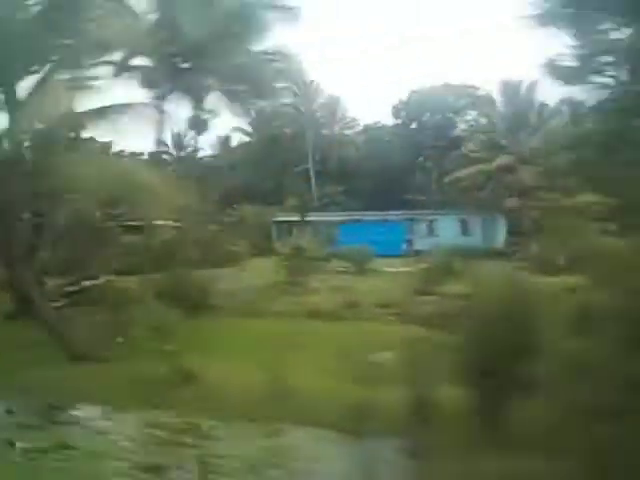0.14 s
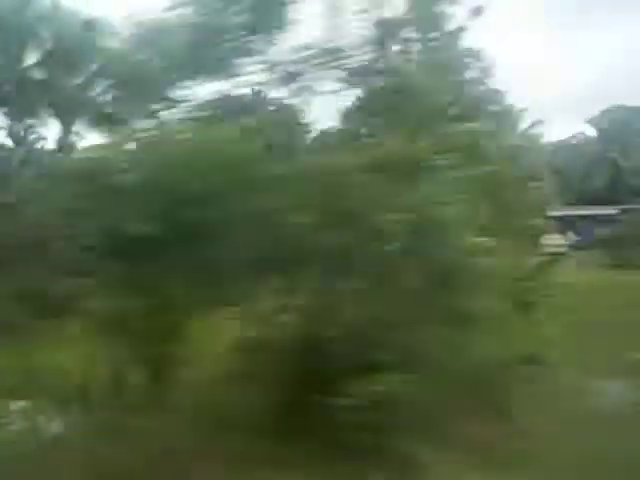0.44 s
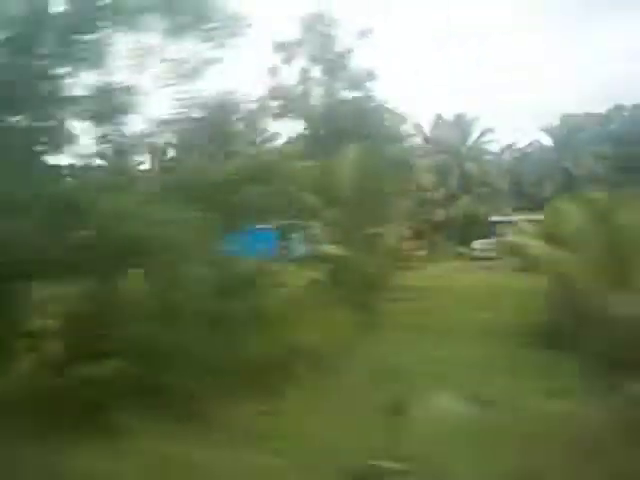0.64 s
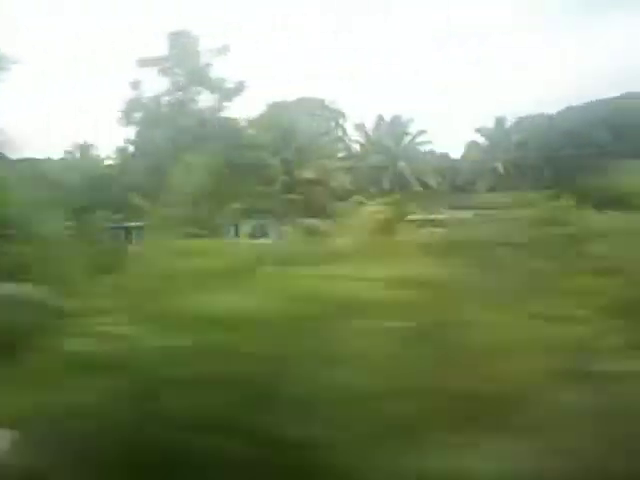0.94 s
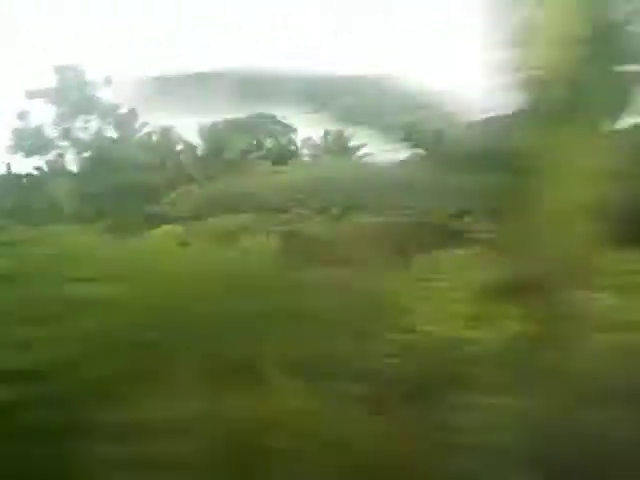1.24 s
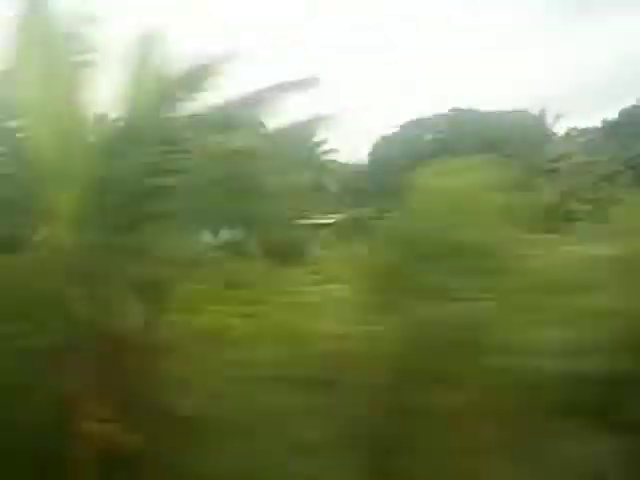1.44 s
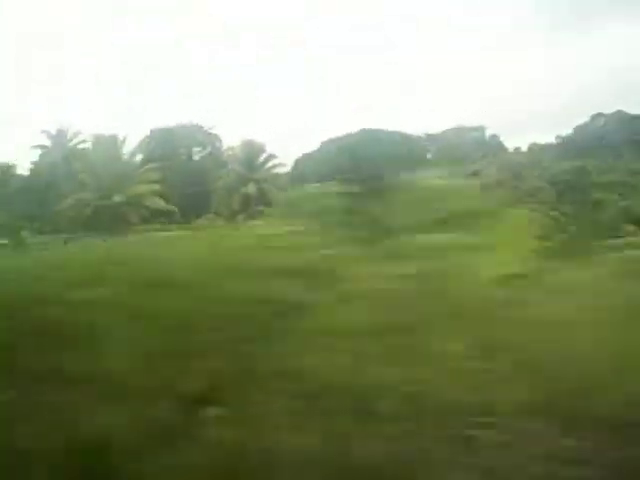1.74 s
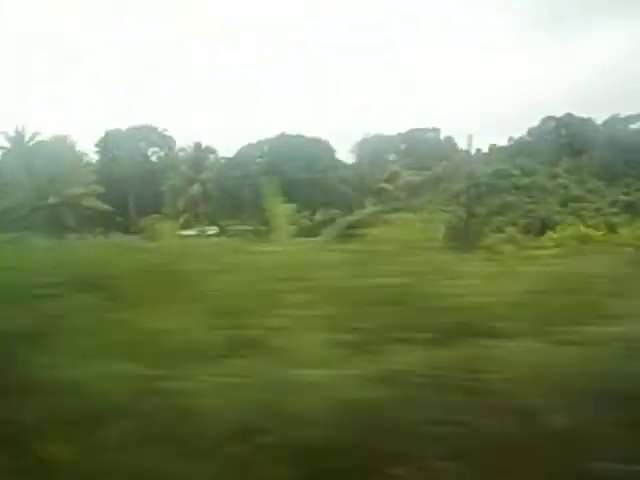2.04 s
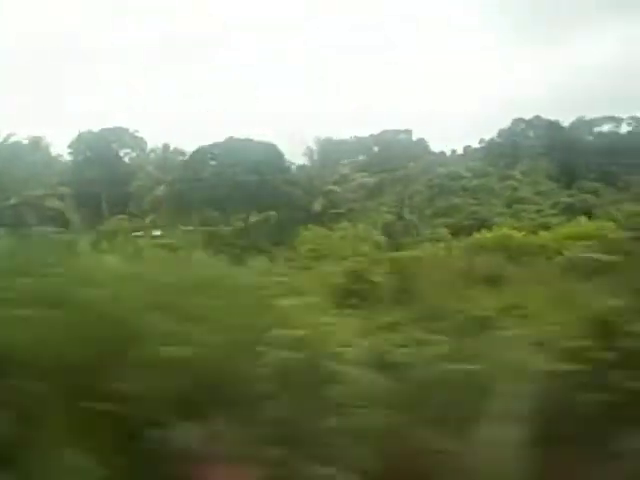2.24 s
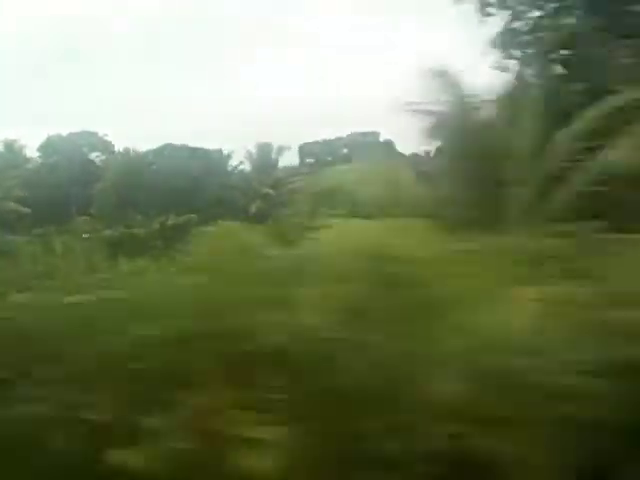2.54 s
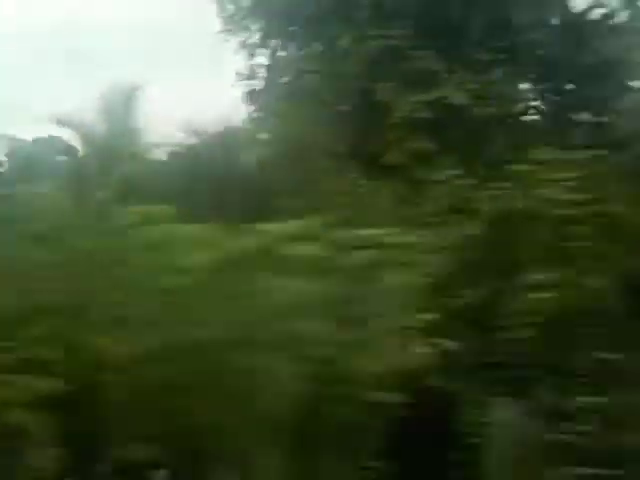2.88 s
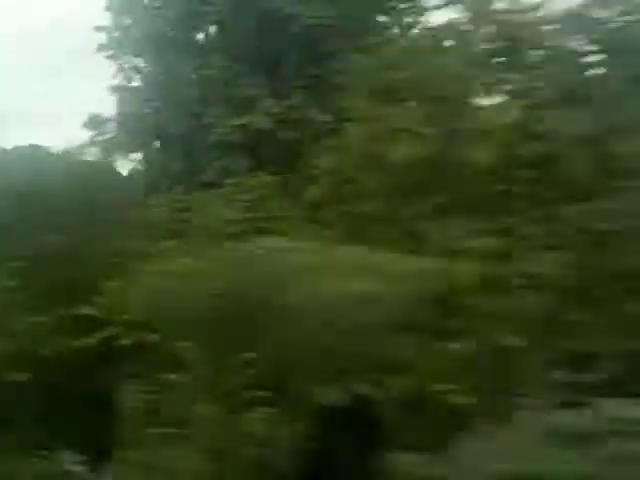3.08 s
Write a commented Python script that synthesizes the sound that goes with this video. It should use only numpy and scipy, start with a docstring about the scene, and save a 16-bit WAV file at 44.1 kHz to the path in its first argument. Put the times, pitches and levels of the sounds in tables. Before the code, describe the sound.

Tyre and body rumble of a bus at speed, with window wind hiss, small squeaks and rattles

```python
"""Tyres and body roar inside a moving bus, heard at a window: flickering noise, with thuds and rings at bumps.
Under it are a low engine drone of wavering tones and a whine of narrow noise bands plus a wavering tone.
Wind hisses as fluttering noise, and roadside growth throws back a short rush with a hollow scrape.
A loose pane rattles in grainy noise bursts and knocks with short rings; a fitting squeaks in falling chirps.
The bass is almost mono and the treble wider; the recorder cuts notches and the very top."""
import sys
import numpy as np
from scipy import signal
from scipy.fft import rfft, irfft
from scipy.io import wavfile

SR = 44100
rng = np.random.default_rng(int(sys.argv[2]) if len(sys.argv) > 2 else 0)


def int16_out(signal):
    """Quantize to a 16-bit WAV file."""
    q = np.round(np.clip(np.atleast_2d(signal).T, -1, 1) * 32767)
    wavfile.write(sys.argv[1], SR, q.astype(np.int16))


N = 141561  # samples, about 3.2 s


def amp(db):
    """Turn decibels into a plain multiplier."""
    return 10 ** (np.asarray(db) / 20)


def freqs():
    """Frequency of every spectral bin in Hz, kept at 1 or more so its logarithm exists."""
    return np.maximum(np.arange(N // 2 + 1) * SR / N, 1)


def colour(points):
    """Gain of every bin, joining (f/Hz, level/dB) points on a log frequency scale."""
    hz, db = np.array(points, float).T
    return amp(np.interp(np.log(freqs()), np.log(hz), db))


def curve(rows, column=1):
    """One column of a timed table, joined by straight lines and held level beyond its ends."""
    table = np.array(rows, float)
    return np.interp(np.arange(N) / SR, table[:, 0], table[:, column])


# How strong the left-right difference is against the middle: [f/Hz, level/dB]
STEREO_WIDTH = [(30, -37), (130, -46), (300, -64), (600, -59), (900, -20), (1500, -21.5), (2000, -11.5),
                (2700, -6.5), (3400, -4.5), (4300, -11), (5400, -7.5), (6600, -3), (9000, -0.5)]


def noise(gain):
    """Stereo noise of the given strength per root hertz, nearly mono in the bass and wider in the treble."""
    white = rfft(rng.standard_normal((2, N)))
    width = np.array([np.ones(len(gain)), colour(STEREO_WIDTH)])
    middle, side = irfft(white * gain * width, N)
    return np.array([middle + side, middle - side]) * np.sqrt(SR / 2)


def walk(rate):
    """Smooth random drift of unit spread; a higher rate in Hz wanders faster."""
    drift = irfft(rfft(rng.standard_normal(N)) / (1 + (freqs() / rate) ** 4), N)
    return (drift - drift.mean()) / drift.std()


def tone(pitch):
    """A sine that follows a changing pitch in Hz, by adding up its cycles."""
    return np.sin(2 * np.pi * np.cumsum(pitch) / SR)


def burst(start, attack, hold, decay):
    """Loudness that rises, holds and then dies away exponentially; all times in seconds."""
    age = np.arange(N) / SR - start
    fall = np.exp(-np.maximum(age - attack - hold, 0) / decay)
    return np.clip(age / attack, 0, 1) * fall


def restless(points, flicker_db, flicker_rate, count=9):
    """Noise cut into overlapping octave bands, each flickering on its own."""
    octave = np.clip(np.log2(freqs() / (SR / 2)) + count, 0, count - 1)
    gain, total = colour(points), 0
    for k in range(count):
        share = np.sqrt(np.maximum(1 - abs(octave - k), 0))
        total = total + noise(gain * share) * amp(flicker_db * walk(flicker_rate))
    return total


# Tone colour of the wind at the window: [f/Hz, level per hertz/dB]
WIND_COLOUR = [(900, -91.5), (2200, -88.5), (2830, -75), (3300, -84.5), (3750, -81.5), (4250, -77.5),
               (4750, -83), (5500, -89), (6200, -96), (7000, -114.5), (9000, -108), (15000, -120)]
# Slow swell of the wind: [t/s, level/dB]
WIND_SWELL = [(0, 0.39), (.55, -0.79), (.9, 1.7), (1.1, -0.26), (1.4, 0.6), (1.7, 1.2), (2.05, -.5),
              (2.6, 0.25), (3.0, -0.9), (3.2, .3)]


def wind():
    """Wind at the window: hissing noise that flutters both band by band and as a whole."""
    hiss = restless(WIND_COLOUR, flicker_db=1.27, flicker_rate=15)
    return hiss * amp(curve(WIND_SWELL) + 0.91 * walk(45))


# Tone colour of the rush thrown back by passing growth: [f/Hz, level per hertz/dB]
RUSH_COLOUR = [(400, -80), (600, -53.5), (900, -69), (1250, -59.5), (1500, -56), (2100, -58), (2900, -68.5),
               (3500, -75.5), (4500, -76.5), (5600, -77.5), (6400, -82), (7500, -100.5), (11000, -93),
               (15000, -106)]
# How the rush comes and goes: [t/s, level/dB]
RUSH_SWELL = [(.06, -30), (.125, -4.5), (.175, -2), (.215, -8), (.32, -4), (.385, -7), (.43, -19),
              (.49, -7.5), (.58, -33)]
# Hollow resonance in the rush: [t/s, f/Hz, level/dB, pitch waver/Hz]
HOLLOW_PATH = [(.14, 1710, -52, 79), (.166, 1590, -25, 70), (.205, 1550, -30.5, 70), (.232, 1570, -28, 80),
               (.27, 1560, -34.5, 110), (.31, 1554, -30.5, 130), (.39, 1560, -31, 120),
               (.47, 1413, -42, 110), (.54, 1500, -63, 80)]


def passing_growth():
    """Growth throws back a rush of noise; two fast-wavering tones add its hollow, scraping resonance."""
    rush = noise(colour(RUSH_COLOUR)) * amp(curve(RUSH_SWELL) + 1.5 * walk(37))
    pitch, waver = curve(HOLLOW_PATH), curve(HOLLOW_PATH, column=3)
    scrape = sum(tone(pitch + waver * walk(136.7)) for _ in range(2))
    return rush + scrape * amp(curve(HOLLOW_PATH, column=2))


# Tones of the engine drone, before its swell: [f/Hz, level/dB, pitch waver/Hz]
DRONE_TONES = [(83.4, -58.5, 2.7), (140.1, -45.5, 1.42), (269, -50, 5.53)]
# How the drone swells and sinks: [t/s, level/dB]
DRONE_SWELL = [(0, -12), (.14, 3), (.25, -11), (.53, 1), (.8, -1.5), (.94, 1), (1.12, -7), (1.22, 2.5),
               (1.4, -2), (1.65, 3), (2.1, -3), (3.15, 1.5)]


def engine_drone():
    """Low engine tones whose pitch and strength waver separately under a shared swell."""
    drone = 0
    for hz, db, waver in DRONE_TONES:
        strength = np.sqrt(2) * amp(db + 1.26 * walk(4.4))
        drone = drone + strength * tone(hz + waver * walk(7.8))
    return drone * amp(curve(DRONE_SWELL))


# Narrow resonances of the drivetrain, before their flutter: [f/Hz, width/Hz, level/dB]
WHINE_BANDS = [(1898.4, 44, -41.5), (2890, 31, -68), (3990, 15, -62), (6400, 52, -77.5)]
# Brief flares of the whine: [t/s, level/dB, hold/s, f/Hz]
FLARES = [(0.48, -26.5, 0.013, 1918)]
GEAR_HZ, GEAR_DB, GEAR_WAVER_HZ = 1870, -40, 9
WHINE_FLUTTER_DB, WHINE_FLUTTER_RATE_HZ = 3, 35


def drivetrain_whine():
    """Fluttering narrow bands of noise, a wavering gear tone and a brief flare make a rough whine."""
    power = 0
    for hz, width, db in WHINE_BANDS:
        power = power + amp(db) ** 2 / width / (1 + (2 * (freqs() - hz) / width) ** 4)
    rough = noise(np.sqrt(power)) * amp(WHINE_FLUTTER_DB * walk(WHINE_FLUTTER_RATE_HZ))
    whine = rough + np.sqrt(2) * amp(GEAR_DB) * tone(GEAR_HZ + GEAR_WAVER_HZ * walk(39))
    for start, db, hold, hz in FLARES:
        whine = whine + amp(db) * burst(start, 0.0082, hold, 0.0058) * tone(hz + 20 * walk(91))
    return whine


# Squeaks of a fitting: [t/s, level/dB, pitch it falls towards f/Hz]
SQUEAK_EVENTS = [(0.696, -50, 5400), (0.762, -43.5, 5500), (.823, -41.5, 5200), (.999, -41.5, 5160),
                 (1.32, -43, 5300), (1.675, -54, 6000), (2.056, -48.5, 5370), (2.163, -40.5, 5350),
                 (2.273, -47.5, 5240), (2.447, -50, 5500), (2.496, -42, 5250), (2.811, -47, 5160),
                 (3.111, -46.5, 5300)]
SQUEAK_S, SQUEAK_FALL_HZ, SQUEAK_FALL_S, SQUEAK_ROUGH_HZ = 0.014, 1235, 0.0036, 235
CABIN_DECAY_S, CABIN_DB = 0.015, -8


def squeaks():
    """A fitting slips: a tiny, rough, falling chirp, smeared by a fading noise echo of the cabin."""
    t, chirps = np.arange(N) / SR, 0
    rough = SQUEAK_ROUGH_HZ * walk(500)
    for start, db, hz in SQUEAK_EVENTS:
        age = np.maximum(t - start, 0)
        pitch = hz + SQUEAK_FALL_HZ * np.exp(-age / SQUEAK_FALL_S) + rough
        swell = np.sin(np.pi * np.minimum(age / SQUEAK_S, 1) ** 0.88)
        chirps = chirps + amp(db) * swell * tone(pitch)
    tail = rng.standard_normal((2, N)) * np.exp(-t / CABIN_DECAY_S)
    tail /= np.sqrt(np.sum(tail ** 2, axis=1, keepdims=True))
    echo = signal.fftconvolve(chirps[None], tail, axes=1)[:, :N]
    return chirps + amp(CABIN_DB) * echo


# Tone colour of the loose pane, also used for its rattles: [f/Hz, level per hertz/dB]
PANE_COLOUR = [(1200, -72), (2200, -45), (2900, -64), (3500, -67.5), (4300, -63.5), (5300, -68.5),
               (6300, -74.5), (7200, -98), (9000, -85.5), (15000, -86)]
# Sharp knocks of the pane in its frame: [t/s, level/dB, ringing f/Hz, decay/s]
KNOCKS = [(1.1143, -31, 4700, 0.0036), (1.2033, -34.5, 4200, .003), (1.4264, -24.5, 3670, .002),
          (1.4665, -25, 4770, 0.0037), (1.758, -29.5, 4230, 0.0064), (1.767, -33, 4270, .007),
          (1.825, -33, 4270, .006), (1.8374, -33.5, 4280, .005)]
# Ringing modes of a knock: [multiple of its ringing f, level/dB]
KNOCK_MODES = [(.68, -14), (.92, -0.5), (1, 1.5), (1.13, -6), (1.32, -20.5), (1.66, -17)]
CRACK_DB = 21


def knocks():
    """The pane strikes its frame with a noisy crack and rings in several modes for a few milliseconds."""
    out, crack = 0, noise(colour(PANE_COLOUR)) * amp(CRACK_DB)
    for start, db, hz, decay in KNOCKS:
        age = np.maximum(np.arange(N) / SR - start, 0)
        ring = 0
        for ratio, mode_db in KNOCK_MODES:
            ring = ring + amp(mode_db) * np.sin(2 * np.pi * (hz * ratio * age + rng.random()))
        out = out + amp(db) * burst(start, 0.00035, 0, decay) * (ring / 2 + crack)
    return out


# Rattles of the loose pane, levels relative: [t/s, level/dB, hold/s, brightest f/Hz]
RATTLE_EVENTS = [(0.014, -6.5, .008, 3830), (1.198, -10.5, 0.02, 5030), (1.335, -2, 0.005, 5100),
                 (1.451, -4, 0.0032, 5200), (1.463, 0, 0.006, 5200), (1.494, -13, 0.018, 5500),
                 (1.665, -10.5, 0.031, 5400), (1.743, -3, 0.022, 3580), (1.828, -10, 0.015, 3530),
                 (3.083, -3.5, 0.0053, 3500)]
RATTLE_ATTACK_S, RATTLE_DECAY_S = 0.0014, 0.01
RATTLE_DB, RATTLE_GRAIN_DB = -7, 4.5


def rattles():
    """A loose pane chatters in short grainy noise bursts, each with its own brightest region."""
    out = 0
    for start, db, hold, hz in RATTLE_EVENTS:
        nearness = np.exp(-(np.log2(freqs() / hz) / 0.52) ** 2)
        focus = amp(14 * nearness - 10.5)  # lifts the bright region and lowers the rest
        envelope = burst(start, RATTLE_ATTACK_S, hold, RATTLE_DECAY_S)
        out = out + noise(colour(PANE_COLOUR) * focus) * amp(db) * envelope
    return out * amp(RATTLE_DB + RATTLE_GRAIN_DB * walk(360))


# Tone colour of the tyre and body roar: [f/Hz, level per hertz/dB]
ROAD_COLOUR = [(15, -84), (45, -87), (72, -69.5), (100, -72), (122, -64.5), (190, -66), (270, -61),
               (410, -60), (520, -53.5), (610, -54), (680, -57.5), (850, -57.5), (1000, -62.5), (1170, -63),
               (1320, -60.5), (1550, -61.5), (2150, -63), (2400, -72.5), (2750, -104), (4000, -110)]
# Slow swell of the roar: [t/s, level/dB]
ROAD_SWELL = [(0, -0.5), (.15, -0.6), (.4, -0.1), (.7, 0), (.9, 0.5), (1.2, -.5), (1.5, 1.1), (1.85, 0.5),
              (2.07, -0.5), (2.5, 0.5), (2.8, 0), (2.96, -0.55), (3.2, 0.9)]
# Bumps in the road, levels relative: [t/s, level/dB, hold/s, centre f/Hz]
BUMP_EVENTS = [(0.099, 4, 0.056, 640), (0.284, 7, 0.022, 840), (0.368, 2.5, 0.023, 490),
               (0.736, 3.5, 0.012, 997), (0.918, 6, 0.021, 800), (1.613, 8, 0.012, 319.7),
               (1.707, 2.5, 0.043, 1050), (1.87, 5.5, .018, 1020), (2.189, 3, 0.028, 639),
               (2.448, 4, 0.023, 380), (2.468, 6, 0.024, 853), (2.565, 4, 0.015, 720),
               (2.722, 7, .012, 399), (2.754, 5, .018, 1050)]
BUMP_ATTACK_S, BUMP_DECAY_S, BUMP_OCTAVES = 0.0039, 0.019, 0.41
BUMP_THUD_DB, BUMP_RING_DB, BUMP_WAVER = -1.5, -36, 0.0912  # waver is a share of the pitch


def road():
    """Tyres and body roar as flickering noise; each bump makes a panel thud and ring roughly."""
    roar = restless(ROAD_COLOUR, flicker_db=0.73, flicker_rate=9.2) * amp(curve(ROAD_SWELL))
    shake = 1 + BUMP_WAVER * walk(145.6)
    for start, db, hold, hz in BUMP_EVENTS:
        panel = np.exp(-(np.log2(freqs() / hz) / BUMP_OCTAVES) ** 2)
        thud = noise(colour(ROAD_COLOUR) * panel) * amp(BUMP_THUD_DB)
        ring = amp(BUMP_RING_DB) * tone(hz * shake)
        roar = roar + (thud + ring) * amp(db) * burst(start, BUMP_ATTACK_S, hold, BUMP_DECAY_S)
    return roar


def scene():
    """Everything heard from the seat, added together."""
    background = wind() + passing_growth() + engine_drone() + drivetrain_whine()
    fittings = squeaks() + knocks() + rattles()
    return background + fittings + road()


# Narrow notches of the recorder: [f/Hz, width/Hz]
RECORDER_NOTCHES = [(1770, 184), (2530, 308), (4965, 154)]
SELF_NOISE_DB = -101.5  # per hertz, before its tone colour
GAP_HZ, TOP_HZ = (6950, 8650), 15750


def record(dry):
    f = freqs()
    hiss_colour = colour([(3000, 11.5), (9000, -12.5), (11000, 1.5), (13000, -3.5), (16000, 0.0)])
    hiss = noise(amp(SELF_NOISE_DB) * hiss_colour)
    notches = 1
    for hz, width in RECORDER_NOTCHES:
        notches = notches * abs(f - hz) / np.hypot(f - hz, width / 2)
    lean = colour([(500, 0), (1100, -0.073), (1500, -1.1), (2000, 0.082), (4000, -0.45), (12000, -0.068)])
    sides = np.array([lean, 1 / lean])  # left and right lean opposite ways
    y = irfft(rfft(dry + hiss) * notches * sides, N)
    gap = signal.butter(5, GAP_HZ, "bandstop", fs=SR, output="sos")
    top = signal.ellip(12, 0.1, 80, TOP_HZ, fs=SR, output="sos")
    return signal.sosfilt(top, signal.sosfilt(gap, y))


dry = scene()
out = record(dry)
int16_out(out)
```